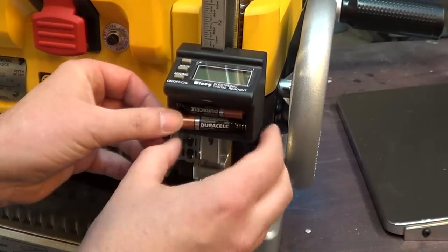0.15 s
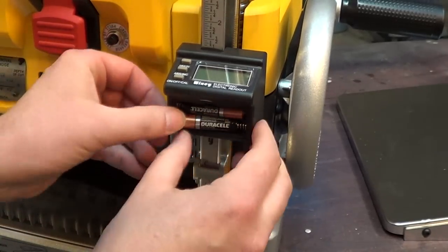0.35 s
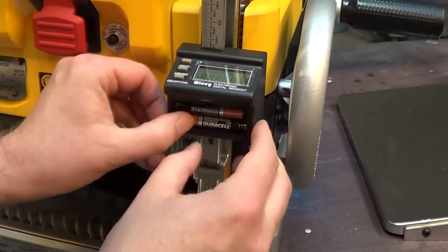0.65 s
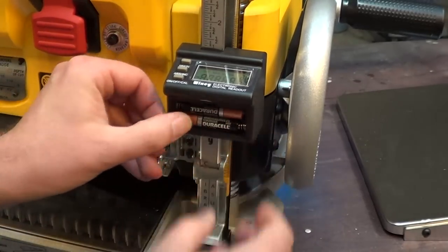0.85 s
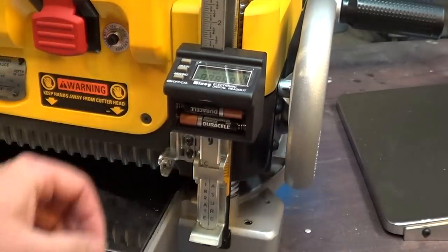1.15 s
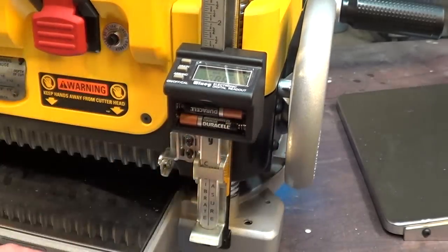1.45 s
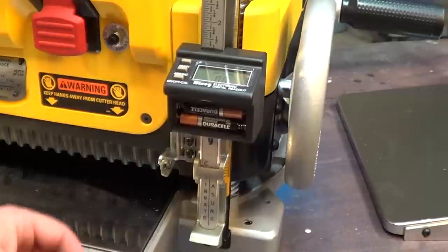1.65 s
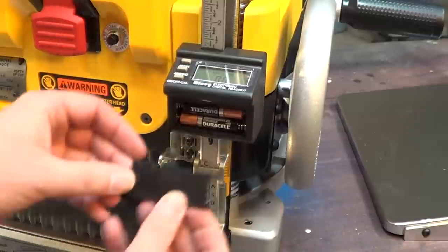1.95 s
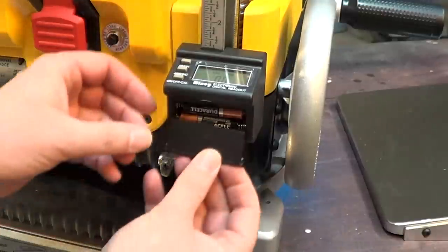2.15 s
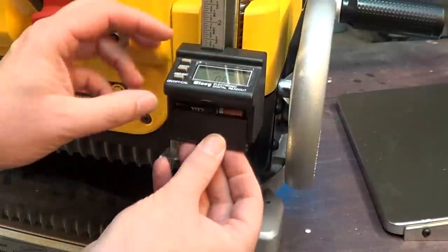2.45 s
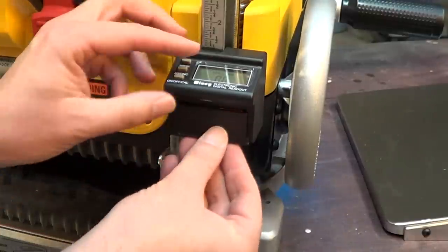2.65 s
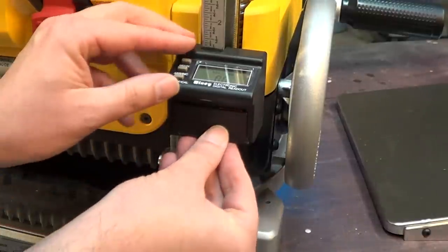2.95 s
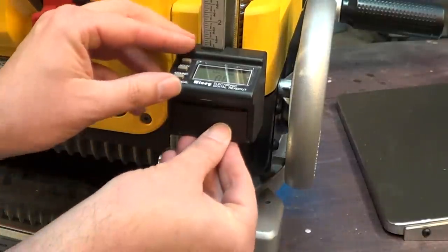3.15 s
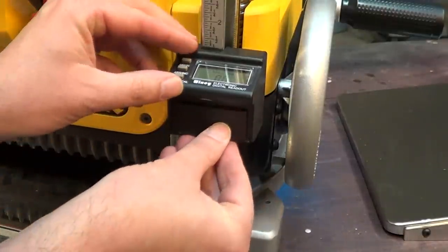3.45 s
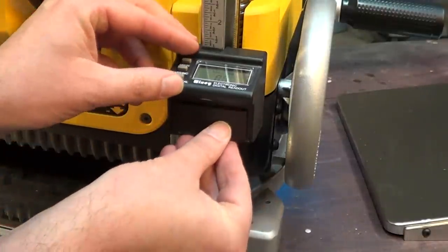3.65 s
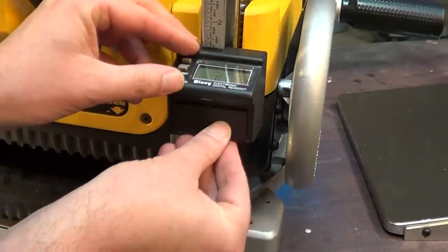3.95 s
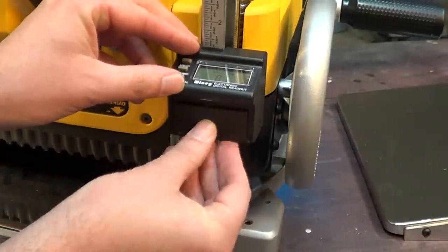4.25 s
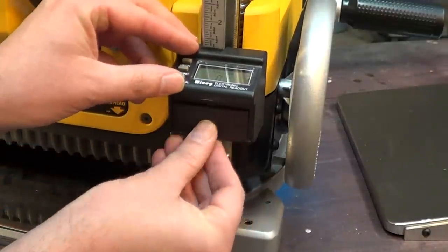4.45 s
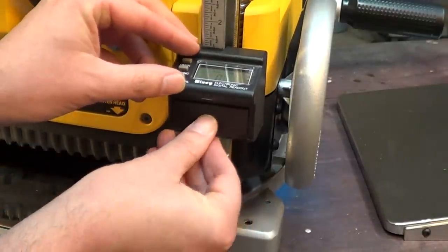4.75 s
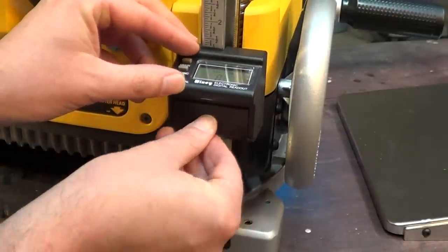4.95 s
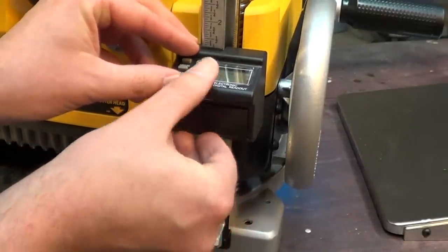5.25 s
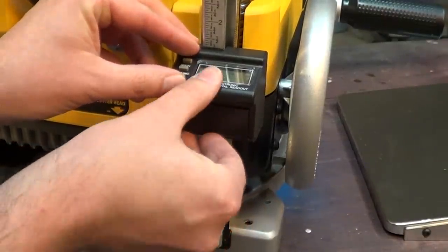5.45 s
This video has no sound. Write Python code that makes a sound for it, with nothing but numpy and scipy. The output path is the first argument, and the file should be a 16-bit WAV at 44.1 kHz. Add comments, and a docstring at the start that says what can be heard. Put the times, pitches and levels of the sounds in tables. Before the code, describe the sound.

Sharp plastic clicks and light scrapes as a battery is pressed in and a cover snapped closed, with a quiet fan humming behind.

```python
"""A small plastic gauge on a workshop machine clicks as fingers press a battery in, lift its cover off
the bench, slide it on and snap it shut. Each contact is a rough little push that rings the plastic's
modes, and the housing changes voice as it closes. Slides are runs of slips, edges squeak, and three of
the clicks also knock the machine and ring its sheet metal. Behind them sit a short room tail, steady
air, a humming fan, a wavering low rumble and a thin whine at the top of hearing."""
import sys
import numpy as np
from scipy import signal
from scipy.fft import rfft, irfft
from scipy.io import wavfile

SR = 44100
rng = np.random.default_rng(int(sys.argv[2]) if len(sys.argv) > 2 else 0)


def unload_audio(sound):
    """Save the sound as a 16-bit wav file, at the path given as the first command line argument."""
    columns = np.transpose(np.atleast_2d(sound))
    # keep every value between -1 and 1, then stretch to whole-number steps
    steps = np.round(np.clip(columns, -1, 1) * 32767)
    wavfile.write(sys.argv[1], SR, steps.astype(np.int16))


N = 247401

# colour of the workshop air: f/Hz, relative level/dB
AIR_COLOUR = [(15, -66), (25, -31.5), (60, -12.5), (125, -12.5), (150, -14), (200, -8), (450, -11),
              (620, -17.5), (950, -19.5), (2000, -27), (5000, -35), (9000, -37.5), (12500, -45),
              (15000, -41.5), (15700, -53)]
# how alike the air is left and right: f/Hz, likeness/0-1
AIR_LIKENESS = [(60, 1.0), (130, 0.99), (290, 0.97), (640, 0.9), (1410, 0.52), (3100, 0.65), (6820, 0.65),
                (15000, 1)]
# fan tones: f/Hz, rms level/dB, skirt width/Hz, skirt/tone ratio
FAN_TONES = [(120.4, -59.5, 0.93, 0.24), (189.6, -66, 4.6, 0.69), (258.3, -52.5, 0.68, 0.2)]
# level of a low rumbling noise near 72 Hz that wavers: t/s, level/dB
RUMBLE_LEVEL = [(0.0, -50), (0.2, -62), (0.7, -53.5), (0.82, -62), (1.8, -58), (1.89, -48.5), (1.97, -61),
                (4.08, -64.5), (4.25, -52.5), (4.62, -54.5), (4.72, -62), (5.61, -60)]
# clicks on the housing: t/s, level/dB, low trim/dB, upper trim/dB, top trim/dB, contact/ms
HOUSING_CLICKS = [(0.404, -66.5, -5, 4, -1, 42), (0.532, -10.5, -5.5, 1.5, -18, 1.06),
                  (0.534, -11, -4.5, 2.5, -8, 1.19), (2.4112, -34, -8, 4.5, -2, 5.9),
                  (2.4145, -13.5, -9.5, -3.5, 2, 0.74), (2.595, -43, 4.5, -4, -13, 1.8),
                  (2.7107, -33.5, -1.5, -12, -14, 1.5), (2.7177, -46, 2, 7, -10, 1.8),
                  (3.889, -56, -3, 4, -2, 4), (4.175, -51, -10, -6, -14, 15), (4.358, -47, -6, -12, -10, 4),
                  (4.3739, -21, -14, -6, -2.5, 0.86), (4.4984, -15, -4, -0.5, -8, 1.87),
                  (4.5134, -24.5, -10, -8, -14, 2.2), (4.7225, -30.5, -7, -10, -16, 6.9),
                  (4.7368, -19, -16, -2, -6, 1.6), (4.7386, -12.5, -2, -0.5, -8, 1.24),
                  (4.7623, -19, -11, -8, -10, 1.1), (4.807, -50, -8, 2, 8, 3), (4.939, -58, -5, -2, 8, 2.5),
                  (5.2234, -35.5, -9, 3.5, -2, 2), (5.2405, -36.5, -6, -2, -11, 3.1)]
# the loose cover touching the bench: columns as for the clicks
COVER_SCRAPES = [(1.2051, -40, 11.5, 8, -9, 8), (1.213, -50.5, 17, 2, -8, 21), (1.235, -52, 3, 6, -9, 70),
                 (1.318, -51.5, 16, 13, 0, 15), (1.342, -39, -8, 0, 0, 4), (1.482, -52, 4, 2, 8, 59),
                 (1.639, -38.5, -5, 1, -9, 2.1), (1.956, -47.5, 5, -10, -10, 6.9)]
# modes of the open housing: f/Hz, width before damping/Hz, level/dB
OPEN_MODES = [(945, 200, 2), (1150, 170, 4.5), (1646, 170, 8.5), (2270, 110, 2.5), (2850, 230, 6),
              (3520, 230, 13.5), (4080, 400, 6), (4990, 510, 1), (6000, 390, 2), (6720, 430, 7.5),
              (7750, 760, 13.5), (8500, 740, 11), (9330, 290, 8), (11200, 470, 10.5), (12100, 750, 11.5),
              (14200, 900, 3), (14900, 780, -10)]
# same columns: the cover alone, held loosely against the housing, and clipped in
COVER_MODES = [(904, 100, 5.5), (1734, 160, 5), (2090, 160, 2), (3296, 170, 1.5), (3960, 190, 2),
               (5300, 1040, 4.5), (6770, 530, 6.5), (7570, 410, 6), (9270, 460, 7.5), (9860, 190, 6.5),
               (10430, 320, 2.5), (12100, 600, -0.5), (13600, 470, 0.5), (15300, 610, -10)]
TOUCHING_MODES = [(760, 230, 7), (1460, 340, 10), (1770, 250, 9.5), (2080, 300, 3.5), (3050, 410, 5),
                  (3800, 230, 11), (4490, 340, 3.5), (5400, 1100, 6.5), (6900, 650, 9), (7550, 320, 5),
                  (8340, 500, 9), (8950, 350, 5.5), (10100, 560, 6), (11360, 370, 5), (12000, 450, 3),
                  (13200, 900, 2), (15200, 700, -12)]
SEATED_MODES = [(708, 210, 0.5), (920, 170, 5.5), (1630, 330, 6.5), (2220, 270, -2.5), (3010, 490, 7),
                (3740, 440, 5), (5030, 420, 0), (5950, 330, 3.5), (6570, 280, 3), (7040, 330, 3.5),
                (8060, 740, 5), (8860, 400, 2), (10200, 1200, 4), (11800, 1000, 5.5), (13000, 450, 3.5),
                (15000, 1200, -8)]
# knocks on the machine under three of the clicks: t/s, level/dB, trim above BRIGHT_HZ/dB
MACHINE_KNOCKS = [(0.536, -27, 6), (2.713, -42.5, -2), (4.74, -30.5, -4)]
# sheet metal rung through the gauge mount: f/Hz, level/dB, t60/s
METAL_MODES = [(244, -11.5, 0.12), (416.4, -4.5, 0.088), (547, -6, 0.17), (764, -8.5, 0.041),
               (1840, -13, 0.13), (2216, -19, 0.18), (3440, -23, 0.41), (3460, -13, 0.1)]
# cover dragged on the bench: t/s, length/s, peak place/0-1, level/dB, low, upper and top trims/dB
COVER_DRAGS = [(1.352, .022, .55, -37, 6.5, 10, -1.5), (1.5206, .031, .55, -24.5, -9.5, 1, 3.5)]
# plastic sliding on the housing: columns as for the drags
HOUSING_SLIDES = [(2.682, .036, 0.65, -47, -11, -4, -7.5), (4.085, 0.018, .5, -49, -6, -7, -10),
                  (4.415, .04, .5, -54, -8, -8, -4), (5.226, 0.015, 0.3, -47, -6, 4, -4)]
# a sliding edge sings on one resonance: t/s, level/dB, contact/ms, f/Hz, width before damping/Hz
EDGE_SQUEAKS = [(1.535, -16.5, 18, 5600, 80), (1.536, -23, 17, 6830, 120), (2.699, -35, 13, 3770, 200),
                (4.418, -44, 12, 7000, 300), (4.444, -40, 12, 3550, 250), (4.444, -37.5, 14, 8000, 300)]
# decay of the room: f/Hz, t60/s
ROOM_DECAY = [(400, 0.79), (1000, 0.71), (2500, 0.63), (5500, 0.48), (8500, 0.42), (11000, 0.23),
              (14000, 0.14)]

TRIM_HZ = (1300, 3600, 7200, 12000)  # centres of the low, main, upper and top modes
LIFT_S, TOUCH_S, SEATED_S = 1.45, 2.0, 3.5  # the cover leaves the bench, meets the housing, is clipped in
AIR_DB, AIR_TOP_HZ = -56, 15790
WHINE_HZ, WHINE_DB, THROB_HZ, THROB_DEPTH, MAINS_HZ = 15734.3, -69, 13.0, 0.45, 59.94
ROOM_DB, ROOM_LIKENESS = -16, 0.73
BRIGHT_HZ, LOWPASS_HZ = 3000, 16600


def gain_of(db):
    """Decibels to gain."""
    return 10 ** (np.asarray(db) / 20)


def unit_rms(x):
    """Scale to an rms of one."""
    return x / np.sqrt(np.mean(x ** 2) + 1e-20)


def curve_at(points, hz):
    """Read a curve on a log-frequency axis."""
    f, value = np.transpose(points)
    return np.interp(np.log(hz + 1), np.log(f + 1), value)


def add(mix, s, sound):
    """Mix a sound in at s seconds."""
    part = mix[round(s * SR):][:len(sound)]
    part += sound[:len(part)]


def stereo(mid, side, likeness):
    """Spread mid and side to left and right; a likeness of 1 is mono."""
    turn = np.arccos(np.clip(likeness, 0, 1)) / 2
    return np.cos(turn) * mid + np.sin(turn) * np.outer([1, -1], side)


def narrow_noise(hz, width):
    """Noise of unit rms in one bell-shaped band."""
    f = np.fft.rfftfreq(N, 1 / SR)
    return unit_rms(irfft(rfft(rng.standard_normal(N)) / (1 + ((f - hz) / width) ** 2), N))


def air():
    """A steady bed of workshop air and hiss, near mono in the lows and wider in the mids."""
    hz = np.fft.rfftfreq(N, 1 / SR)
    mid, side = rfft(rng.standard_normal((2, N)))
    colour = gain_of(curve_at(AIR_COLOUR, hz)) / (1 + np.exp((hz - AIR_TOP_HZ) / 12))
    band = (hz > 600) & (hz < 6000)  # AIR_DB sets the level of this band
    colour /= np.sqrt(2 * np.sum(colour[band] ** 2) / N)
    return gain_of(AIR_DB) * irfft(colour * stereo(mid, side, curve_at(AIR_LIKENESS, hz)), N)


def fan_hum():
    """Fan tones, each a steady sine with a fuzzy skirt, over a low rumbling noise that wavers."""
    tones, t = np.zeros(N), np.arange(N) / SR
    for hz, db, skirt_hz, share in FAN_TONES:
        sine = np.sqrt(2) * np.sin(2 * np.pi * (hz * t + rng.random()))
        tones += gain_of(db) * unit_rms(sine + share * narrow_noise(hz, skirt_hz))
    rumble_gain = gain_of(np.interp(t, *np.transpose(RUMBLE_LEVEL)))
    return tones + rumble_gain * narrow_noise(hz=72.4, width=7.2)


def whine():
    """A thin throbbing tone, with faint side tones below it at steps of the mains rate."""
    t = np.arange(N) / SR
    throb = 1 + THROB_DEPTH * np.sin(2 * np.pi * (THROB_HZ * t + rng.random()))
    tone = throb * np.sin(2 * np.pi * WHINE_HZ * t)
    buzz = sum(np.sin(2 * np.pi * (WHINE_HZ - MAINS_HZ * k) * t) for k in range(1, 6))
    return gain_of(WHINE_DB) * unit_rms(tone + 0.066 * buzz)


def fingertips(per_s=2.5, floor_db=-59.5, spread_db=2, contact_ms=4.2):
    """Contact rows for faint brushes of the fingers on the housing at random moments."""
    when, size = rng.random((round(per_s * N / SR), 2)).T
    levels = floor_db - spread_db * np.log(size + 1e-3)
    return [(s, db, 0, 0, 0, contact_ms) for s, db in zip(.01 + when * N / SR, levels)]


def plastic_ring(modes, damping):
    """One dying sine a mode; neighbouring modes swing in opposite phase."""
    hz, width, db = np.transpose(modes)[:, :, None]
    t, width = np.arange(2048) / SR, width * damping
    polarity = (-1) ** np.arange(len(modes))[:, None]
    envelope = gain_of(db) * np.sqrt(width / 400) * np.exp(-np.pi * width * t)
    return polarity * envelope * np.sin(2 * np.pi * hz * t)


def contacts(rows, modes, rise, pan_db, blur=3.1, damping=0.58):
    """Short rough forces ring the plastic's modes; returns the close stereo sound and three room sends."""
    close, sends, t = np.zeros((2, N)), np.zeros((3, N)), np.arange(3000) / SR
    rings = plastic_ring(modes, damping)
    blurred_power = abs(rfft(plastic_ring(modes, blur))) ** 2
    hz = np.transpose(modes)[0]
    panned = hz < 11000  # the highest modes stay centred
    noises = rng.standard_normal((len(rows), len(t) + len(modes)))
    for k, ((s, db, low_db, upper_db, top_db, ms), noise) in enumerate(zip(rows, noises)):
        grit, facing = noise[:len(t)], noise[len(t):]
        progress = t / (ms / 1000)
        push = np.exp(-progress ** 3) * np.minimum(progress / rise, 1)
        strength = np.linalg.norm(push)
        rung = signal.fftconvolve((grit * push)[None], rings, axes=1)
        # every mode takes its fair share of the force's energy
        rung *= (strength * np.linalg.norm(rings, axis=1) / np.linalg.norm(rung, axis=1))[:, None]
        trim_db = np.interp(np.log(hz), np.log(TRIM_HZ), [low_db, 0, upper_db, top_db])
        weight = 0.048 * gain_of(db + trim_db)
        lean = 0.13 * np.sign(facing) * panned  # each channel faces another side of a mode
        for channel, sign in zip(close, (1, -1)):
            pan = gain_of(sign * pan_db * panned) * (1 + sign * lean)
            add(channel, s, (pan * weight) @ rung)
        # heard from all sides, the modes add as powers: no notches between them
        puff = irfft(np.sqrt(weight ** 2 @ blurred_power))
        puff = np.roll(puff, 200)[:400] * np.hanning(400)
        add(sends[k % len(sends)], s - 200 / SR, strength * puff)
    return close, sends


def settles(clicks, delay_s=0.003, softer_db=15, contact_ms=2.1):
    """Contact rows for the weaker second touch with which each click settles."""
    return [(s + delay_s, db - softer_db, low - 0.5, upper, top, contact_ms)
            for s, db, low, upper, top, _ in clicks]


def room(sends):
    """Sparse reflections, the treble dying first; each send takes other paths and gets its own tail."""
    taps = np.zeros((len(sends) * 2, SR))
    grid = np.arange(250, SR - 20, 20)
    arrivals = grid + rng.integers(0, 20, (len(taps), len(grid)))
    np.put_along_axis(taps, arrivals, rng.choice([-1., 1.], arrivals.shape), 1)
    hz, t, bands = signal.stft(taps, SR, nperseg=256)
    decay = gain_of(-60 * t / curve_at(ROOM_DECAY, hz)[:, None])
    tails = signal.istft(bands * decay, SR, nperseg=256)[1]
    tails /= np.linalg.norm(tails, axis=1)[:, None]
    mid, side = (signal.fftconvolve(sends, half, axes=1)[:, :N].sum(0) for half in np.split(tails, 2))
    return stereo(mid, side, ROOM_LIKENESS)


def machine_ring():
    """Three of the clicks also knock the machine, and its sheet metal rings duller and longer."""
    out, t = np.zeros(N), np.arange(SR // 2) / SR
    attack = 1 - np.exp(-t / 0.0065)  # the panels take a moment to swing
    for s, knock_db, bright_db in MACHINE_KNOCKS:
        for hz, db, t60 in METAL_MODES:
            envelope = attack * gain_of(knock_db + db + bright_db * (hz > BRIGHT_HZ) - 60 * t / t60)
            add(out, s, envelope * np.sin(2 * np.pi * (hz * t + rng.random())))
    return out


def slips(slides, count=5, jitter=0.08, overlap=1.18, fade_db=21, spread_db=1.1, rub_db=-21.5, rub_ms=52):
    """Contact rows for sliding plastic: an uneven run of slips swells, fades and ends in a soft rub."""
    rows, place = [], np.arange(count) / (count - 1)
    for start, length, peak, db, *trims in slides:
        late, size = rng.standard_normal((2, count))
        gap = length / (count - 1)
        times = start + length * place + jitter * gap * late
        levels = db - fade_db * (place - peak) ** 2 + spread_db * size
        rows += [(s, level, *trims, 1000 * overlap * gap) for s, level in zip(times, levels)]
        rows.append((start + length, db + rub_db, *trims, rub_ms))
    return rows


def squeaks():
    """Each sliding edge sings briefly on a single resonance."""
    return [contacts([(s, db, 0, 0, 0, ms)], [(hz, width, 0)], rise=0.15, pan_db=0.6, blur=1.5)
            for s, db, ms, hz, width in EDGE_SQUEAKS]


def scene():
    """Housing, cover and squeaks up close, with their room, the machine's ring and the workshop bed."""
    housing = sorted(HOUSING_CLICKS + settles(HOUSING_CLICKS) + slips(HOUSING_SLIDES) + fingertips())
    cover = sorted(COVER_SCRAPES + slips(COVER_DRAGS))
    stages = [(0, TOUCH_S, OPEN_MODES), (TOUCH_S, SEATED_S, TOUCHING_MODES),
              (SEATED_S, np.inf, SEATED_MODES)]
    layers = [contacts([row for row in housing if start < row[0] < end], modes, rise=0.09, pan_db=0.5)
              for start, end, modes in stages]
    lying = [row for row in cover if row[0] < LIFT_S]
    lifted = [row for row in cover if row[0] > LIFT_S]
    layers.append(contacts(lying, COVER_MODES, rise=0.26, pan_db=0.7, damping=3.6))  # muted by the bench
    layers.append(contacts(lifted, COVER_MODES, rise=0.17, pan_db=1.1))
    layers += squeaks()
    close, sends = (sum(bus) for bus in zip(*layers))
    return close + gain_of(ROOM_DB) * room(sends) + machine_ring() + air() + fan_hum() + whine()


def record(dry):
    """A steep low-pass on the whole mix, just above the whine."""
    lowpass = signal.firwin(511, LOWPASS_HZ, window=("kaiser", 9), fs=SR)
    return signal.oaconvolve(dry, lowpass[None], "same")


dry = scene()
out = record(dry)
unload_audio(out)
```